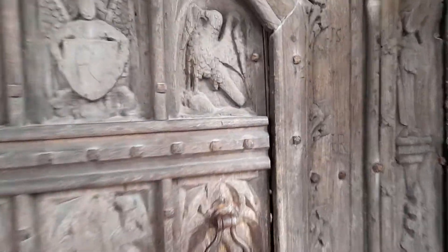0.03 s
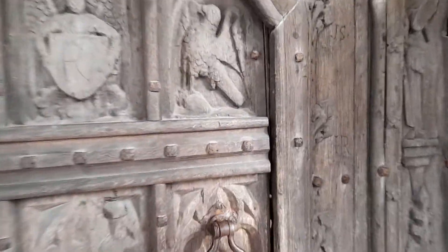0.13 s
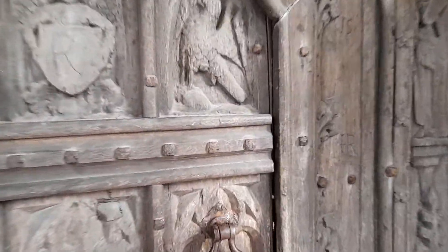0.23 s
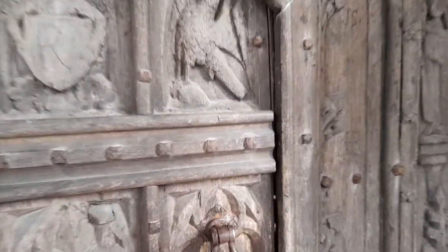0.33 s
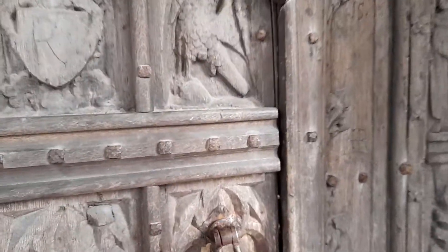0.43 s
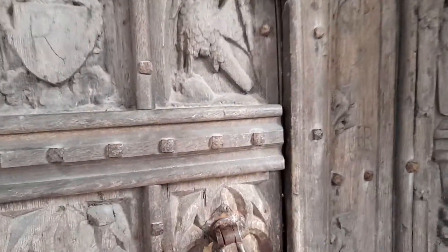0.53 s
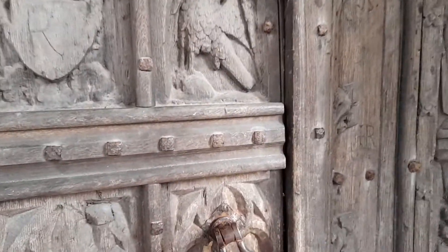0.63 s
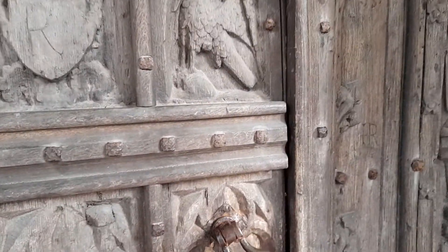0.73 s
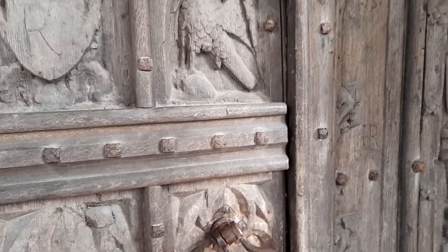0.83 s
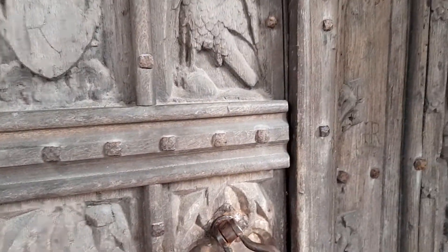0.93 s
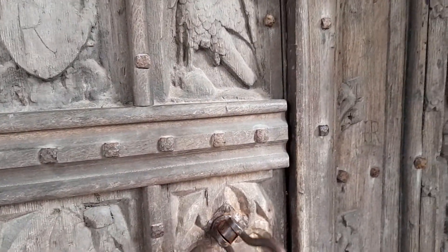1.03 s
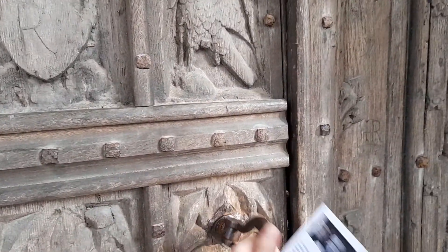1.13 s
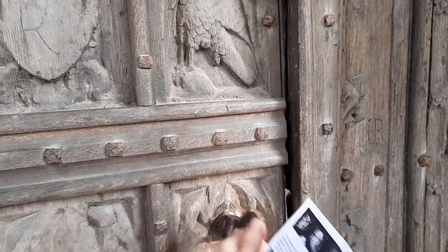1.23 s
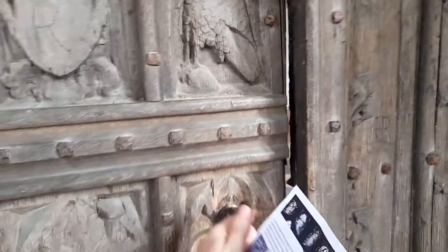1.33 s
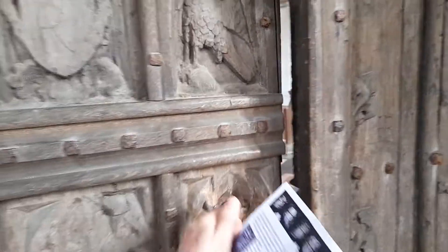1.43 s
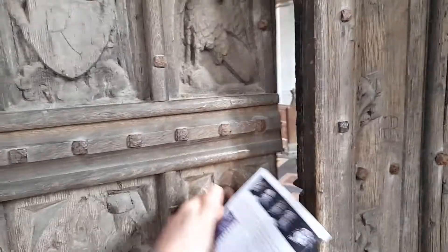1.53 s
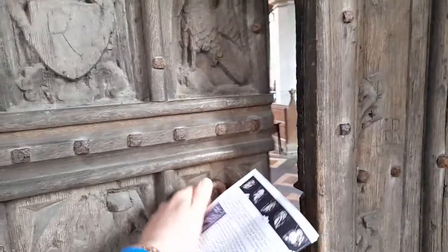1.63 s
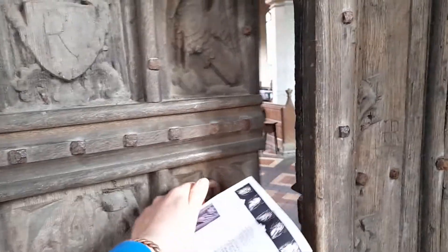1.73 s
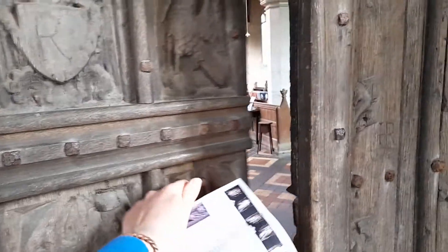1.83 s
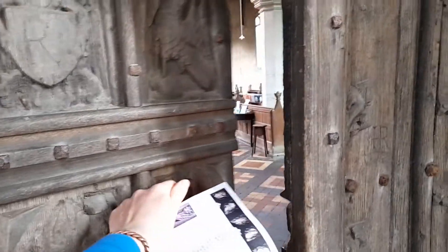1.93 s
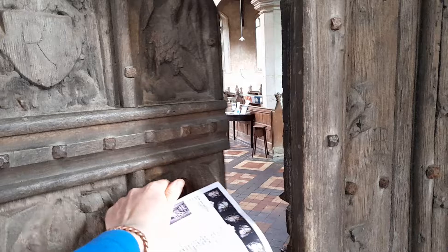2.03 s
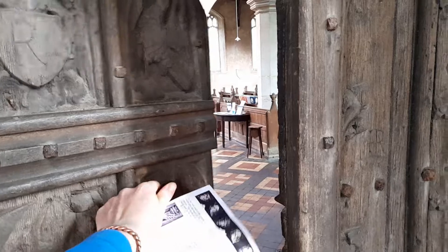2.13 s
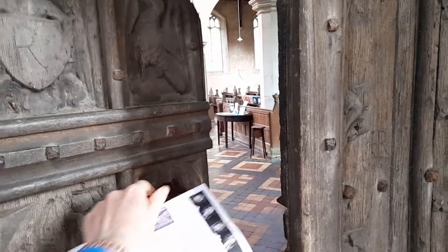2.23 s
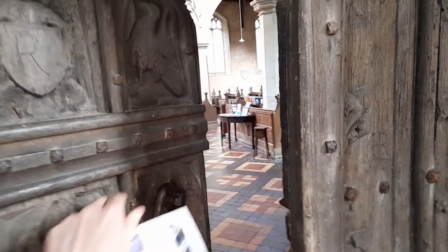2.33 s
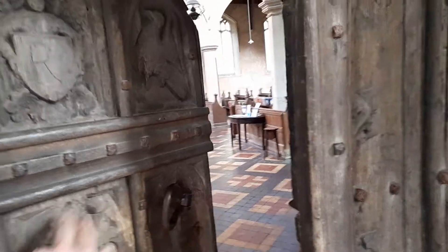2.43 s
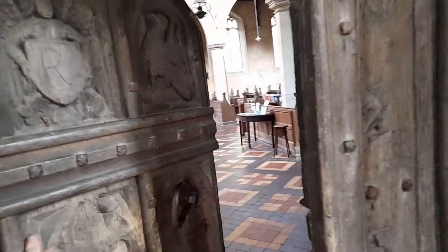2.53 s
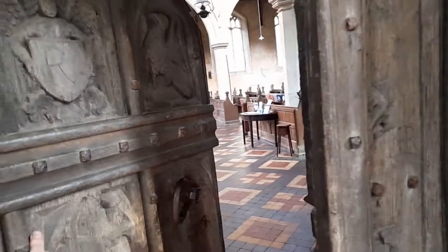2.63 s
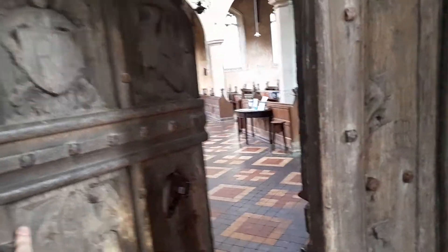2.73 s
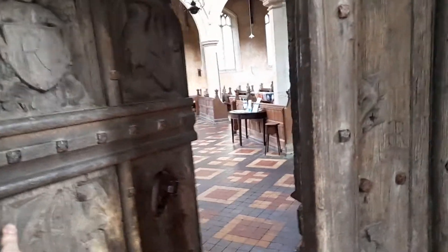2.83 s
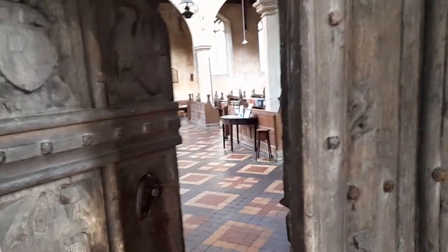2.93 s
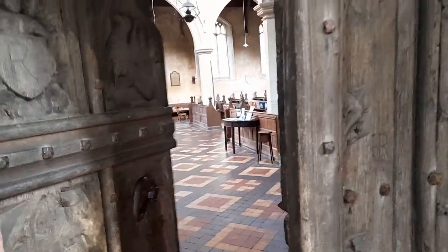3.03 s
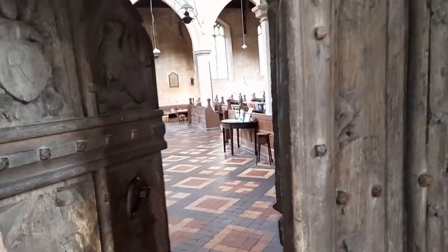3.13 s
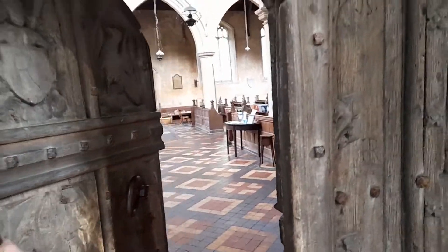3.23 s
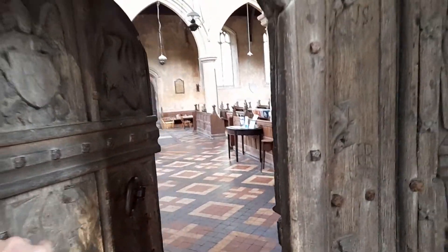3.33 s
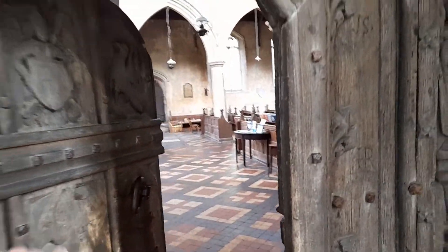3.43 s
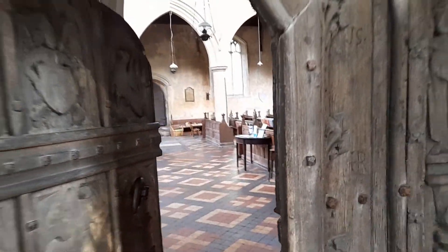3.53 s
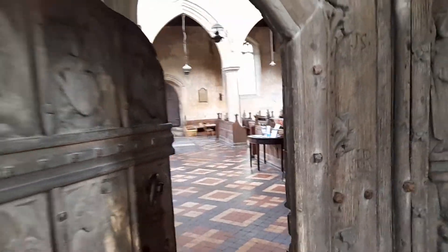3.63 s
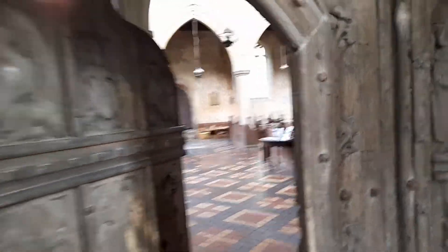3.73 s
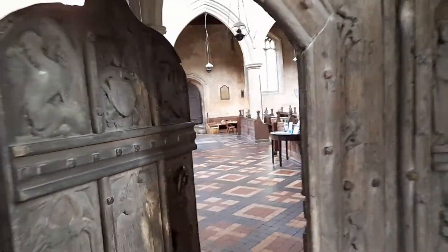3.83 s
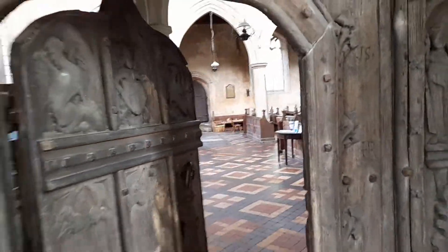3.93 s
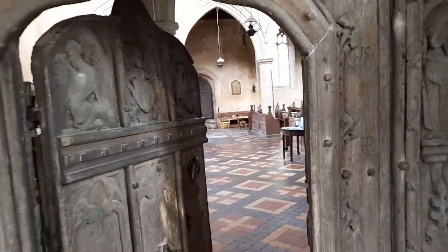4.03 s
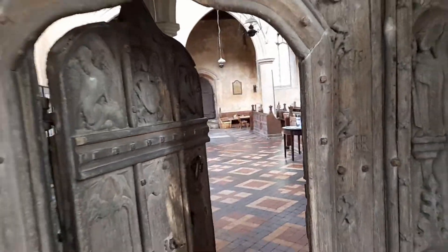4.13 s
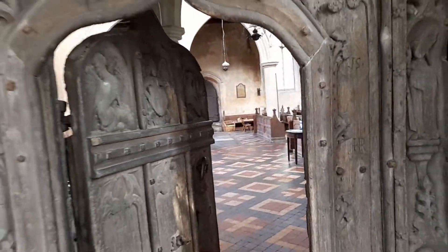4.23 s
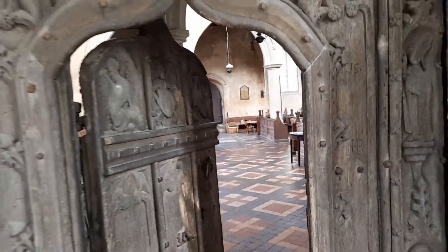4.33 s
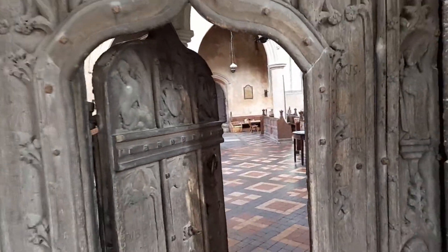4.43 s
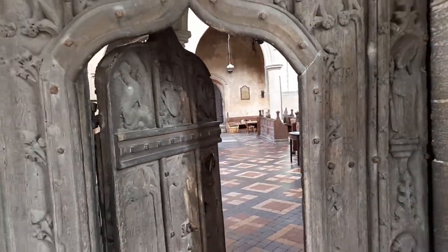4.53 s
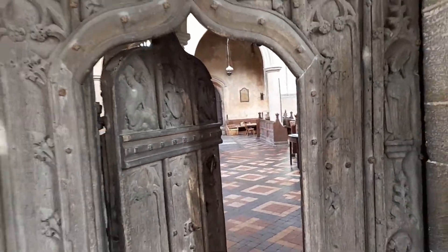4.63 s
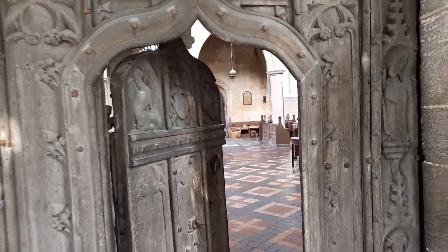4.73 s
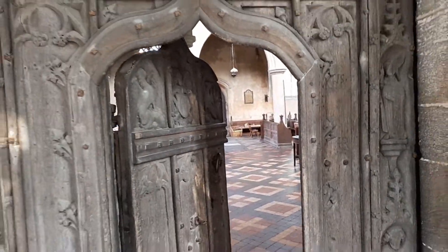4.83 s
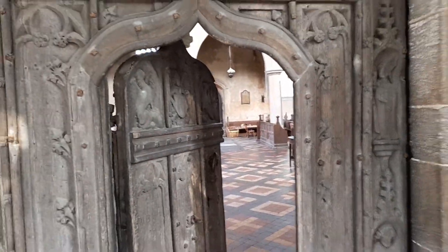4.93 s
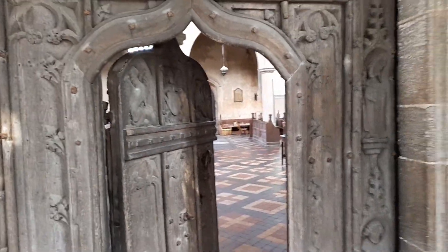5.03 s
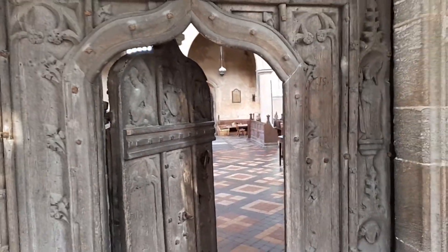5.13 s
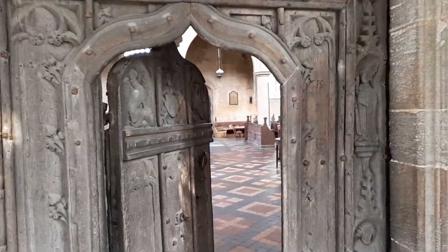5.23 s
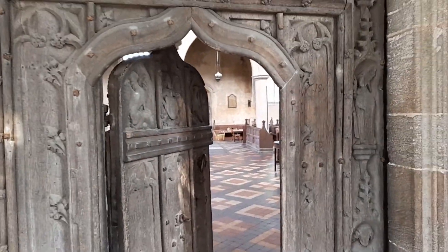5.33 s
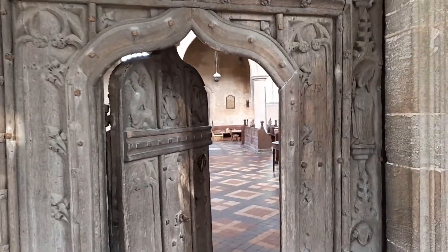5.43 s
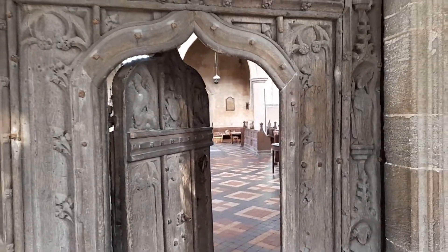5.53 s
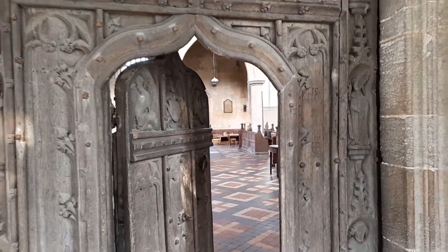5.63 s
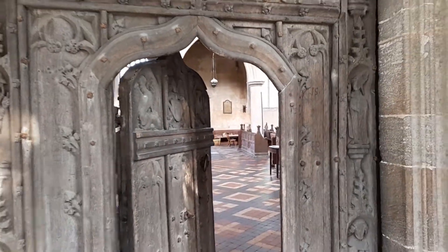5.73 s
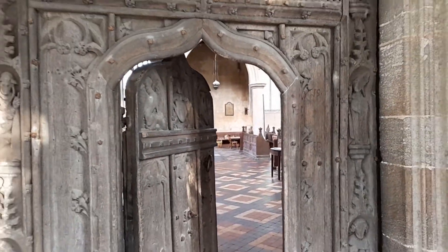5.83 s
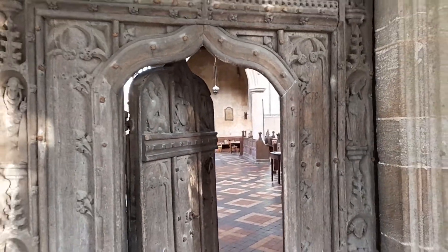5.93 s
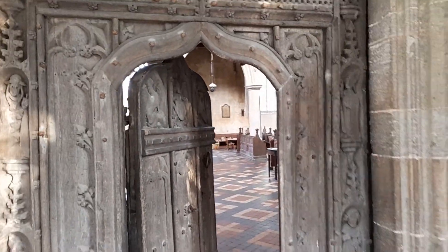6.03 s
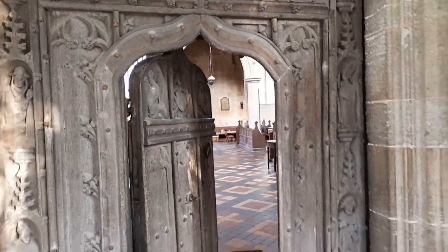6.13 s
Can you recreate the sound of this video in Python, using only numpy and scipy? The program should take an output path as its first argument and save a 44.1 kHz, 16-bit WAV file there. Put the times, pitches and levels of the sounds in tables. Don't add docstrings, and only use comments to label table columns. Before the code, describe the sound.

Close handheld stereo capture of an old wooden door. Fingers and paper scuff quietly, then the metal latch jerks and cracks down, by far the loudest event, ringing off rough stone walls. Light taps follow, a deep quiet hinge groan, and a double wooden thud about a second later. Afterwards sleeves and paper brush, air rumble rises around four seconds, and a shoe lands dully on stone.

```python
import sys
import numpy as np
from scipy import signal
from scipy.fft import rfft, irfft
from scipy.io import wavfile
from scipy.ndimage import uniform_filter1d

SR = 44100
rng = np.random.default_rng(int(sys.argv[2]) if len(sys.argv) > 2 else 0)


def gain_from_db(level_db):
    decades = np.asarray(level_db, float) / 20
    return 10 ** decades


def file_out(sig):
    cols = np.atleast_2d(sig).T
    lim = np.clip(cols, -1, 1)
    pcm = np.round(lim * 32767).astype(np.int16)
    wavfile.write(sys.argv[1], SR, pcm)


N = 272185

# [t/s, roar level/dB, depth level/dB]
RUMBLE = [(0.0, -42.5, 7.5), (0.86, -41.5, 0), (1.37, -37.5, 1), (1.6, -43.5, -13.5), (1.82, -38.5, 8),
          (2.1, -34.5, -8), (3.14, -30.5, -5.5), (3.42, -27.5, -1.5), (3.85, -25.5, -2), (4.05, -19, -3.5),
          (4.239, -21.5, 10), (4.38, -23.5, 7.5), (5.0, -27.5, 4), (5.26, -28, -0.5), (5.52, -23.5, -3.5),
          (5.82, -25.5, -3.5), (5.95, -26.5, -5), (6.17, -27, -3.5)]
# [lowest f/Hz, highest f/Hz]
RUMBLE_BANDS = [(35, 100), (100, 175), (175, 350), (350, 650)]
# [level under the usual roar/dB, share of the swell, share of the depth]
RUMBLE_PARTS = [(-8, 1.23, 0.64), (-7, 0.99, -0.34), (-11, 1.08, -.2), (-18, 0.27, -0.39)]
# [f/Hz, level per Hz/dB]
RUMBLE_SHAPE = [(12, -50), (30, -8), (49, 3), (98, 5), (131, 7.5), (172, -1.5), (306, -12), (341, -14),
                (439, -25.5), (481, -30), (597, -36), (742, -47), (1500, -53.5), (1950, -79), (3300, -120)]
# [f/Hz, width/Hz, boost level/dB]
HUM = [
    (140, 26, 4),
    (293, 14, 5),
    (432, 31, 2.5),
]
# [f/Hz, likeness from -1 to 1]
SAME = [(30, 0.97), (60, 0.92), (180, 1), (550, 0.58), (1650, -0.42), (4970, -0.15), (15000, -0.16)]
# [f/Hz, level per Hz/dB]
HISS = [(350, -39.5), (600, -2), (747, 1), (1160, -13), (1500, -11.5), (2080, -11.5), (2290, -12.5),
        (3190, -16.5), (5740, -13.5), (6760, -17.5), (8080, -30), (10800, -23.5), (15800, -22)]
# [start t/s, length t/s, level/dB, dull part level/dB, bright spot f/Hz]
RUSTLE = [(0.513, 0.21, -60.5, 3.5, 4430), (0.813, 0.17, -59, -1, 4000), (2.437, 0.44, -57.5, -5, 3920),
          (2.812, 0.16, -57.5, 3, 4200), (3.259, 0.2, -53, -13, 4180), (3.392, 0.6, -60.5, -1.5, 3830),
          (3.592, 0.12, -54.5, 0.5, 3280), (4.044, 0.3, -48.5, -15.5, 4250), (4.147, 0.14, -50.5, -8, 4360),
          (4.255, 0.15, -53.5, -11, 4500), (4.802, 0.16, -57.5, 8.5, 2500), (4.904, 0.071, -56.5, 7, 2100),
          (5.656, 0.21, -50.5, -2.5, 5070), (6.03, 0.076, -56, 3, 3100)]
# [start t/s, length t/s, level/dB, dull part level/dB, bright spot f/Hz]
BRUSHES = [(.57, 0.17, -55, -6, 4300), (.72, 0.15, -51, -5.5, 2700), (4.24, 0.25, -56, -5, 4630),
           (4.399, 0.22, -58.5, -2, 4600), (4.4, .13, -51.5, -4.5, 5500), (4.55, 0.38, -66, 2.5, 5000),
           (4.7, 0.13, -57.5, 0, 5500), (4.86, 0.2, -63, 6.5, 2600), (5.0, 0.18, -70, 7, 2600),
           (6.0, 0.2, -64.5, 12.5, 3000), (6.08, 0.086, -65, 15, 2200)]
# [f/Hz, level per Hz/dB]
RUSTLE_SHAPE = [(880, -39), (1500, -10), (3380, -6), (4170, -6.5), (5260, -6), (7030, -3), (8090, -19.5),
                (11200, -11), (15500, -18), (16000, -6), (16500, -45.5)]
# [t/s, peak level/dB, ring f/Hz, left over right level/dB, sizzle level/dB]
TICKS = [(0.5202, -35, 5630, -11, -20), (0.828, -38.5, 5900, -5, 6), (0.895, -41.5, 4300, -10, -12),
         (0.954, -40.5, 2480, -6, -16), (0.989, -44.5, 4200, -10, -13), (1.026, -46, 4020, -12, -10),
         (1.063, -40.5, 3800, -8, -14), (1.598, -25, 2610, -5, -3), (1.599, -30, 5500, -3, -8),
         (1.604, -41, 4500, -3, -9), (2.0188, -44.5, 5670, -10, 7.5), (2.218, -33.5, 6360, -12, -6),
         (2.3768, -41.5, 4500, -6, -5), (2.569, -56.5, 2650, -2, -9), (2.649, -42.5, 3230, -2.5, 7.5),
         (3.2588, -47, 2340, -3, 2), (3.2948, -39.5, 4200, -4, -7), (3.5848, -32.5, 5030, -6, -4),
         (3.6829, -31.5, 5830, -4, -8), (4.0277, -41.5, 5300, -2, -5), (4.041, -37, 5400, 3, -7),
         (4.063, -39, 4240, 5, -6), (4.8053, -45, 3000, 1.5, -3), (4.82, -43.5, 2900, 4, 5),
         (4.942, -45, 2100, 0.5, -2)]
# [t/s, peak level/dB, dull ring f/Hz, dull ring level/dB, clang level/dB]
TAPS = [(0.5228, -41.5, 860, 6.5, -20), (0.5377, -53, 1060, 17, 7), (0.782, -49.5, 1140, 10, 0),
        (.788, -57.5, 800, 19.5, 0), (0.851, -55.5, 1140, 19, -6), (.853, -56, 800, 17.5, -6),
        (1.15, -46, 1250, -3, 5), (1.207, -37.5, 1120, 15, 0), (1.46, -55.5, 700, 25, -3),
        (1.471, -34.5, 1034, 5.5, 0), (1.5217, -26.5, 1040, -11, -6.5), (1.549, -35, 1150, 2.5, -5),
        (1.599, -41, 800, 4, -6), (2.206, -56, 760, 11, -11.5), (2.229, -18.5, 1140, -20.5, -14),
        (2.813, -36, 1060, -2, -29), (3.1652, -42, 856, -9, -19.5), (3.3494, -44.5, 1200, 2.5, -16),
        (4.129, -56.5, 1090, 14, -2.5), (4.5445, -54, 993, 4.5, -6), (5.657, -48, 1270, 9.5, -8.5),
        (5.659, -50, 800, 18, -14), (6.035, -60, 1370, 11.5, 3)]
# [f/Hz, level per Hz/dB]
TICK = [(500, -21), (1200, 1.5), (2500, 2), (7000, -0.5), (8200, -16), (11500, -10.5), (13500, -20.5),
        (16000, -21.5)]
# [f/Hz, level per Hz/dB]
SIZZLE = [(5000, -40), (8600, -4), (11000, -2), (15500, -1.5)]
# [start t/s, length t/s, level/dB, f/Hz, width/Hz]
SCUFFS = [(0.64, .04, -60.5, 2500, 300), (.74, .04, -62, 2500, 200), (.778, .045, -59, 2200, 300),
          (5.403, .08, -74, 3810, 75), (1.205, 0.02, -38, 1180, 90), (1.235, .03, -46, 1190, 98),
          (5.405, .035, -67, 5660, 150), (6.039, .05, -66, 3100, 220), (6.03, .11, -57, 1300, 300)]
# [start t/s, length t/s, level/dB, f/Hz, width/Hz]
GROANS = [
    (1.3, 1.18, -37.5, 140, 6.2),
    (2.551, 0.65, -43, 427.5, 54),
    (3.75, 0.32, -48.5, 505.6, 160),
    (4.19, 1.1, -34.5, 103.1, 34),
    (5.199, 0.41, -32, 300.8, 43),
]
# [t/s, f/Hz, level/dB]
SQUEAK = [(1.09, 660, -54), (1.12, 646, -46), (1.135, 640, -36), (1.145, 625, -28), (1.153, 621, -26),
          (1.161, 629, -31), (1.172, 627, -33)]
# [multiple of the pitch, level/dB]
SQUEAK_ORDERS = [(1, 1.5), (2, -14), (3, -23), (4, -34), (5, -45)]
# [t/s, level/dB, decay t/s, ring level/dB, echo level/dB]
SLIP = [
    (1.1522, -24, .012, -36, -44),
    (1.1575, -33, .035, -46, -52),
]
# [f/Hz, level per Hz/dB]
SLIP_SHAPE = [(500, -20.5), (900, -4.5), (1500, 0.5), (2300, -1), (3000, -13.5), (4500, -20.5),
              (7000, -39.5)]
# [f/Hz, level/dB, t60 t/s]
SLIP_RING = [(1500, 0.5, .015), (2150, -3, .015)]
# [t/s, crack level/dB, iron level/dB, door thump level/dB, crack decay t/s]
LATCH = [(1.1697, -9, -15, -17.5, .012), (1.1728, -24, -16.5, -9, .009),
         (1.1755, -23.5, -26.5, -19.5, .006), (1.1772, -10, -24.5, -17.5, .012),
         (1.1787, 2, -11.5, -21.5, .009), (1.1812, -17, -32.5, -14.5, .01),
         (1.1838, -19.5, -33.5, -22, .01), (1.187, -23.5, -35, -26.5, .01), (1.198, -32.5, -37, -29, .02),
         (1.2105, -32, -36, -31, .02), (1.2185, -25.5, -34.5, -32.5, .02),
         (1.2255, -30.5, -35.5, -31.5, .02), (1.242, -34, -39.5, -34, .02)]
# [t/s, level/dB, decay t/s]
SNAP = [
    (1.1697, -15.5, .006),
    (1.1784, -6.5, .005),
]
# [f/Hz, level per Hz/dB]
CRACK = [(600, -11.5), (2300, -9.5), (3790, -6.5), (5370, -6), (7200, -0.5), (8600, -16), (11300, -2.5),
         (13500, -4), (15600, -4), (16600, -25)]
# [f/Hz, level/dB, t60 t/s]
CATCH = [(2090, -3, 0.015), (3903, -1.5, 0.023), (5350, -3, 0.022), (7450, 5, 0.0075), (12700, -7, 0.009)]
# [f/Hz, level/dB, t60 t/s]
IRON = [(2040, -11, .02), (2290, -4, .025), (4860, -6, .02), (6220, -3, .016), (6820, 3, .016),
        (7250, -12, .03), (10900, -8, .015), (11600, -4, .015), (13000, -10, .01)]
# [f/Hz, level/dB, t60 t/s]
DOOR = [(261, -12, 0.3), (344.8, -16, 0.22), (443, 10, 0.029), (605, -4.5, 0.21), (769, 4.5, 0.043),
        (825, -3.5, 0.08), (1143, -5, 0.028)]
# [t/s, f/Hz, level/dB]
DOOR_SIGH = [
    (1.178, 390, -31),
    (1.188, 308.4, -27.5),
    (1.2, 272, -29.5),
    (1.225, 265, -41.5),
]
# [f/Hz, level per Hz/dB]
LATCH_ECHO = [(180, -11.5), (300, 7.5), (567, -1.5), (717, -4.5), (1190, -7.5), (1380, -15), (2240, -9.5),
              (2650, -16.5), (3140, -9.5), (4690, -13.5), (7130, -5), (8160, -26), (11400, -8.5),
              (15400, -19.5), (16500, -49.5)]
# [f/Hz, t60 t/s]
PORCH = [(250, 0.26), (700, 0.6), (1700, 0.73), (4600, 0.53), (7000, 0.42), (11500, 0.34), (15500, 0.36)]
# [t/s, level/dB, decay t/s, ring level/dB, echo level/dB]
KNOCKS = [
    (2.2287, -19.5, 0.042, -27.5, -34),
    (2.237, -18.5, 0.01, -25.5, -33),
    (2.2405, -34.5, 0.022, -31.5, -44),
]
# [f/Hz, level per Hz/dB]
KNOCK_SHAPE = [(180, -23), (300, -7), (420, 6.5), (720, -6), (1500, -10), (2200, -10), (2800, -22),
               (4000, -14), (7500, -26), (12100, -21), (15500, -50)]
# [f/Hz, level/dB, t60 t/s]
PANEL = [(390, -2, 0.15), (715, -1.5, 0.1), (885, -7, 0.082), (1140, 2.5, 0.028), (1983, -2, 0.038),
         (2200, -7, .03)]
# [f/Hz, level per Hz/dB]
KNOCK_ECHO = [(290, -31), (500, 3), (737, -1), (1200, -4), (1600, -5), (1900, -2), (2150, -4), (2400, -15),
              (4000, -20), (6000, -24), (7450, -33), (15500, -42)]
# [t/s, f/Hz, level/dB]
HINGE_LOW = [(3.15, 555, -77.5), (3.184, 601.3, -57), (3.372, 602, -54), (3.55, 605, -59.5)]
HINGE_HIGH = [(4.7, 2990, -75), (4.75, 2990, -66), (4.79, 2985, -69), (4.83, 2980, -61), (4.91, 2970, -62),
              (4.95, 2950, -70), (5.01, 2930, -66), (5.1, 2900, -79)]
# [t/s, f/Hz, level/dB]
SOLE_SQUEAK = [(4.06, 4160, -56), (4.1, 4170, -55), (4.14, 4060, -71), (4.19, 4140, -57), (4.21, 4200, -79)]
# [t/s, level/dB, decay t/s, ring level/dB, echo level/dB]
STEPS = [
    (5.656, -27, 0.063, -37.5, -22.5),
    (5.694, -25, 0.2, -27.5, -35),
    (5.749, -37.5, 0.12, -33, -35.5),
]
# [f/Hz, level per Hz/dB]
STEP_SHAPE = [(150, -20.5), (300, 14), (500, -2.5), (700, -6), (880, 0.5), (1050, -22), (1350, -21),
              (1700, -42), (4000, -24), (8000, -100)]
# [f/Hz, level/dB, t60 t/s]
FLAGSTONE = [(148.2, 17.5, 0.14), (286, 9, 0.1), (650, -9, 0.04), (880, -9, .07), (1255, -24, .025)]
# [t/s, f/Hz, level/dB]
STEP_RING = [(5.675, 894, -47), (5.69, 880, -45), (5.73, 865, -49), (5.76, 850, -54.5), (5.82, 790, -60)]

TOP_HZ = 15830
USUAL_DB, HISS_DB = -32, -65.5
RUB_RISE_S, RUB_FADE_DB = 0.017, -14
BRUSH_RISE_S, BRUSH_FADE_DB = .08, -4
RUB_BEND, LET_GO = 0.8, .45
SPOT_DB, SPOT_WIDTH_HZ = 8, 550
TICK_DULL_HZ, TICK_DULL_DB = 835, -33
HANDLE_HZ, CLANG_HZ, TAP_PAN_DB, TAP_SIZZLE_DB = 3900, 1980, -3.5, -18.5
BLOW_RISE_S, WOOD_RISE_S, HEEL_RISE_S = .0008, .001, .0015
KEEPER_BLOWS = 2
LATCH_ECHO_DB, GROAN_ENDS_DB = -12, -4.5
PORT_LAG = 1


def evened(x):
    return x / np.sqrt(np.mean(x ** 2) + 1e-20)


def read(points, hz):
    f, value = np.transpose(points)
    return np.interp(np.log(hz + 1), np.log(f + 1), value)


def add(mix, s, sound, pan_db=0):
    for port, sign in ((0, 1), (1, -1)):
        part = mix[port, round(s * SR + port * PORT_LAG):][:len(sound)]
        part += gain_from_db(sign * pan_db / 2) * sound[:len(part)]


def frames(size):
    return np.arange(N * 4 // size + 5) * size / 4 / SR, np.fft.rfftfreq(size, 1 / SR)


def noise(magnitude, same):
    size = 2 * magnitude.shape[1] - 2
    a, b, c, d = rng.standard_normal(magnitude.shape + (4,)).T
    same = np.clip(same, -1, 1)[:, None]
    left = a + 1j * b
    right = same * left + np.sqrt(1 - same ** 2) * (c + 1j * d)
    z = np.array([left, right]) * magnitude.T
    return signal.istft(z, nperseg=size, noverlap=size * 3 // 4)[1][:, :N] * np.sqrt(3 * SR / size)


def patches(shape, long, wide):
    along_time = uniform_filter1d(rng.standard_normal(shape), int(long), 0)
    return evened(uniform_filter1d(along_time, int(wide), 1))


def soft_start(rise_s):
    return np.minimum(np.arange(SR // 4) / SR / rise_s, 1)


def modes(table, factor=1):
    t = np.arange(SR // 4) / SR
    return sum(gain_from_db(db - 60 * t / t60) * np.sin(2 * np.pi * hz * factor * t) for hz, db, t60 in table)


def crack(shape, t60):
    white = rng.standard_normal(SR // 4)
    hz = np.fft.rfftfreq(len(white), 1 / SR)
    coloured = evened(irfft(rfft(white) * gain_from_db(read(shape, hz)), len(white)))
    return .5 * coloured * gain_from_db(-60 * np.arange(len(white)) / SR / t60)


def pulse(shape):
    wave = irfft(gain_from_db(read(shape, np.fft.rfftfreq(1024, 1 / SR))))
    wave = np.roll(wave, 256)[:512] * np.hanning(512)
    return wave / np.linalg.norm(wave)


def blows(events, shape, body, echo, rise_s):
    out, sent = np.zeros((2, 2, N))
    rise = soft_start(rise_s)
    for s, db, t60, ring_db, echo_db in events:
        add(out, s, rise * (gain_from_db(db) * crack(shape, t60) + gain_from_db(ring_db) * modes(body)))
        add(sent, s, gain_from_db(echo_db + 25.0) * pulse(echo))
    return out, sent


def tone(rows, orders, wobble):
    s, hz, db = np.transpose(rows)
    t = np.arange(s[0], s[-1], 1 / SR)
    shake = evened(signal.detrend(uniform_filter1d(rng.standard_normal((2, len(t))), 200)))
    phase = 2 * np.pi * np.cumsum(np.interp(t, s, hz) * (1 + wobble * shake[0])) / SR
    level_db = np.interp(t, s, db)
    wave = 0
    for k, order_db in orders:
        growth_db = .4 * (k > 1) * (level_db - db.max())
        wave = wave + gain_from_db(order_db + growth_db) * np.sin(k * phase)
    loudness = np.sqrt(2) * gain_from_db(level_db + 60 * wobble * shake[1])
    return s[0], loudness * wave * signal.windows.tukey(len(t), .1)


def whistle(rows, width_hz):
    s, hz, db = np.transpose(rows)
    t = np.arange(s[0], s[-1], 1 / SR)
    r = np.exp(-np.pi * width_hz / SR)
    fuzz = signal.lfilter([1], [1, -2 * r, r * r], rng.standard_normal((len(t), 2)) @ [1, 1j])
    wave = (fuzz * np.exp(2j * np.pi * np.cumsum(np.interp(t, s, hz)) / SR)).real
    return s[0], gain_from_db(np.interp(t, s, db)) * evened(wave) * signal.windows.tukey(len(t), .1)


def rumble():
    t, hz = frames(size=4096)
    hum_db = sum(db / (1 + (2 * (hz - f) / w) ** 2) for f, w, db in HUM)
    shape = gain_from_db(read(RUMBLE_SHAPE, hz) + hum_db)
    s, roar_db, depth_db = np.transpose(RUMBLE)
    swell_db = np.interp(t, s, roar_db) - USUAL_DB
    depth_db = np.interp(t, s, depth_db)
    centres, lifts = [], []
    for (lo, hi), (db, swell, deep) in zip(RUMBLE_BANDS, RUMBLE_PARTS):
        own_db = 10 * np.log10(np.sum(shape[(hz > lo) & (hz <= hi)] ** 2) * hz[1])
        centres.append(np.sqrt(lo * hi))
        lifts.append(USUAL_DB + db + swell * swell_db + deep * depth_db - own_db)
    field_db = np.array([read(np.transpose([centres, row]), hz) for row in np.transpose(lifts)])
    field_db += 1.5 + 2.5 * patches(field_db.shape, long=5, wide=3)
    return gain_from_db([[-.4], [.4]]) * noise(shape * gain_from_db(field_db), read(SAME, hz))


def hiss():
    t, hz = frames(size=1024)
    field = gain_from_db(read(HISS, hz) + 1.2 * patches((len(t), len(hz)), long=8, wide=6.7))
    return gain_from_db(HISS_DB + 6.0) * evened(noise(field * (hz > 550) * (hz < TOP_HZ), 0 * hz + 0.017))


def rustle():
    t, hz = frames(size=256)
    power = np.zeros((len(t), len(hz)))
    rubs = [(*row, RUB_RISE_S, RUB_FADE_DB) for row in RUSTLE]
    rubs += [(*row, BRUSH_RISE_S, BRUSH_FADE_DB) for row in BRUSHES]
    for start, length, level_db, dull_db, spot_hz, rise_s, fade_db in rubs:
        spot_db = SPOT_DB / (1 + ((hz - spot_hz) / SPOT_WIDTH_HZ) ** 2)
        bright = gain_from_db(read(RUSTLE_SHAPE, hz) + spot_db) * (hz > 1800) * (hz < TOP_HZ)
        bright /= np.sqrt(np.sum(bright[(hz > 2200) & (hz < 7600)] ** 2) * hz[1])
        dull = gain_from_db(dull_db) / np.sqrt(1400) / (1 + (np.log(hz / 1300 + 1e-9) / 0.79) ** 4)
        along = np.clip((t - start) / length, 0, 1)
        rise = np.clip((t - start) / rise_s, 0, 1)
        end = np.clip((1 - along) / LET_GO, 0, 1)
        stroke = rise * gain_from_db(level_db + fade_db * along ** RUB_BEND) * end
        power += np.outer(stroke ** 2, bright ** 2 + dull ** 2)
    flicker_db = 1.52 * patches((len(t), 1), long=9.4, wide=1)
    flicker_db = flicker_db + 1.9 * patches((len(t), len(hz)), long=22, wide=4.9)
    magnitude = gain_from_db(flicker_db - 3.5) * np.sqrt(power)
    return gain_from_db([[-1.8], [1.8]]) * noise(magnitude, np.full(129, .15))


def clicks():
    out, sent = np.zeros((2, 2, N))
    events = []
    for s, db, hz, pan_db, top_db in TICKS:
        rings = [(hz, -8, .015), (TICK_DULL_HZ, TICK_DULL_DB, .02)]
        events.append((s, db, rings, pan_db, top_db))
    for s, db, hz, dull_db, clang_db in TAPS:
        rings = [(HANDLE_HZ, -11, .02), (hz, dull_db, .017), (hz * 1.28, dull_db - 10.5, .012),
                 (hz * 0.83, dull_db - 9.5, .014), (CLANG_HZ, clang_db, .028)]
        events.append((s, db, rings, TAP_PAN_DB, TAP_SIZZLE_DB))
    rise = soft_start(BLOW_RISE_S)
    for s, db, rings, pan_db, top_db in events:
        dry_tick = gain_from_db(-6.5) * crack(TICK, 0.034)
        sizzle = gain_from_db(top_db - 4.5) * crack(SIZZLE, .02)
        add(out, s, rise * gain_from_db(db) * (dry_tick + sizzle + modes(rings)), pan_db)
        add(sent, s, gain_from_db(db + 4.0) * pulse(TICK))
    return out, sent


def porch(x):
    taps = rng.standard_normal((2, SR)) * (np.arange(SR) > 340)
    hz, t, (left, other) = signal.stft(taps, SR, nperseg=256)
    same = np.clip(read(SAME, hz), -1, 1)[:, None]
    z = np.array([left, same * left + np.sqrt(1 - same ** 2) * other])
    fade = gain_from_db(-60 * t / read(PORCH, hz)[:, None])
    tail = signal.istft(z * fade, SR, nperseg=256)[1][:, 256:]
    return signal.fftconvolve(x.mean(0)[None], tail / np.linalg.norm(tail[0]), axes=1)[:, :N]


def groan(start, length, db, hz, width_hz):
    along = np.linspace(0, 1, num=9)
    level_db = db + GROAN_ENDS_DB * (2 * along - 1) ** 2
    return whistle(np.transpose([start + length * along, hz + 0 * along, level_db]), width_hz)


def latch():
    out, sent = np.zeros((2, 2, N))
    add(out, *tone(SQUEAK, SQUEAK_ORDERS, wobble=.025), pan_db=7)
    add(out, *tone(DOOR_SIGH, [(0.96, 0)], wobble=.02))
    rise = soft_start(BLOW_RISE_S)
    for s, db, t60 in SNAP:
        add(out, s, rise * gain_from_db(db) * crack(SIZZLE, t60))
    for k, (s, crack_db, iron_db, door_db, t60) in enumerate(LATCH):
        add(out, s, rise * gain_from_db(crack_db + 3.5) * crack(CRACK, t60), pan_db=-2.0)
        for side in (-1, 1):
            add(out, s, rise * gain_from_db(crack_db - 12) * crack(CRACK, t60), pan_db=side * 24 - 2)
        struck = CATCH if k < KEEPER_BLOWS else IRON
        add(out, s, rise * gain_from_db(iron_db + 2) * modes(struck, rng.uniform(0.92, 1.005)), pan_db=-6.5)
        add(out, s, gain_from_db(door_db - 13.5) * modes(DOOR, rng.uniform(1.0, 1.02)), pan_db=3.0)
        add(sent, s, gain_from_db(LATCH_ECHO_DB + crack_db + 19.5) * pulse(LATCH_ECHO))
    return out, sent


def bar_slip():
    return blows(SLIP, SLIP_SHAPE, SLIP_RING, SLIP_SHAPE, WOOD_RISE_S)


def knocks():
    return blows(KNOCKS, KNOCK_SHAPE, PANEL, KNOCK_ECHO, WOOD_RISE_S)


def footstep():
    return blows(STEPS, STEP_SHAPE, FLAGSTONE, STEP_SHAPE, HEEL_RISE_S)


def narrow_dip(x):
    hz = np.fft.rfftfreq(N, 1 / SR)
    return irfft(rfft(x) * gain_from_db(-16 / (1 + ((hz - 8150) / 110) ** 2)), N)


def scene():
    near, sent = np.sum([clicks(), latch(), bar_slip(), knocks(), footstep()], 0)
    for row in GROANS + SCUFFS:
        add(near, *groan(*row), pan_db=-1.0)
    add(near, *whistle(HINGE_LOW, width_hz=14))
    add(near, *whistle(SOLE_SQUEAK, width_hz=300))
    add(near, *whistle(HINGE_HIGH, width_hz=60))
    add(near, *whistle(STEP_RING, width_hz=160))
    return narrow_dip(near + porch(sent)) + rumble() + hiss() + rustle()


def top_cut(x):
    return signal.sosfilt(signal.butter(12, 16840, fs=SR, output="sos"), x)


def record(dry):
    hz = np.fft.rfftfreq(N, 1 / SR)
    bass_cut = 1 / (1 + (38 / (hz + 1)) ** 7)
    band_limit = gain_from_db(-np.clip(hz - TOP_HZ, 0, 2000) / 30)
    overloaded = 0.78 * np.tanh(dry / 1.058)
    mix = irfft(rfft(overloaded) * bass_cut * band_limit, N)
    return top_cut(mix)


dry = scene()
out = record(dry)
file_out(out)
```